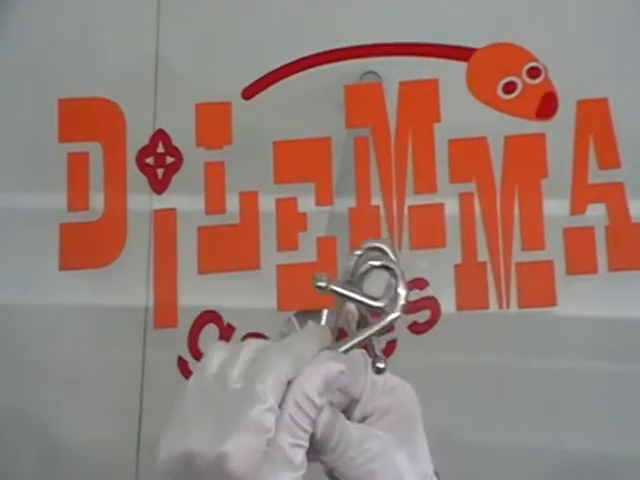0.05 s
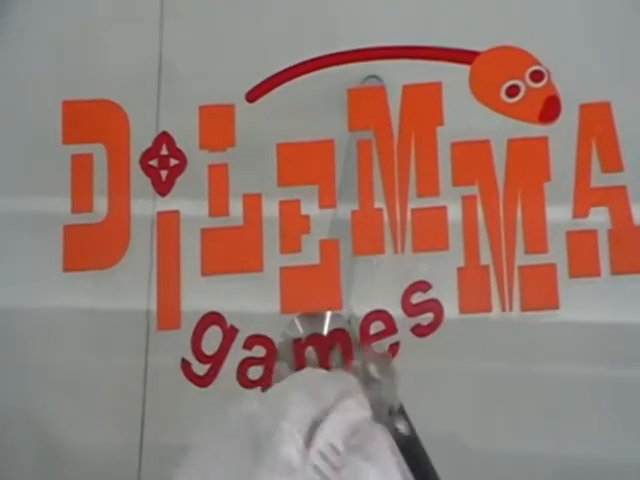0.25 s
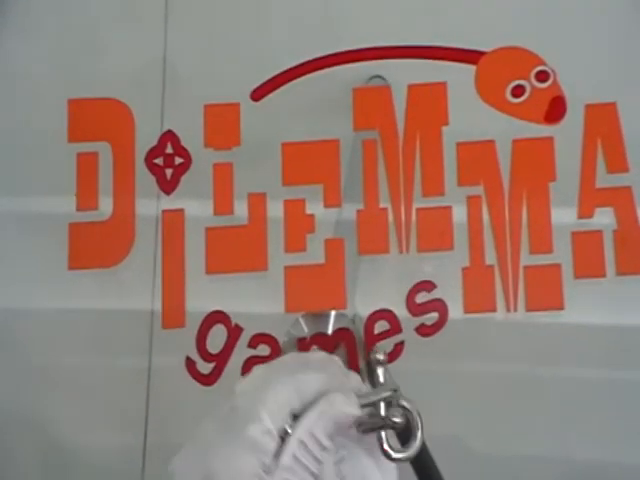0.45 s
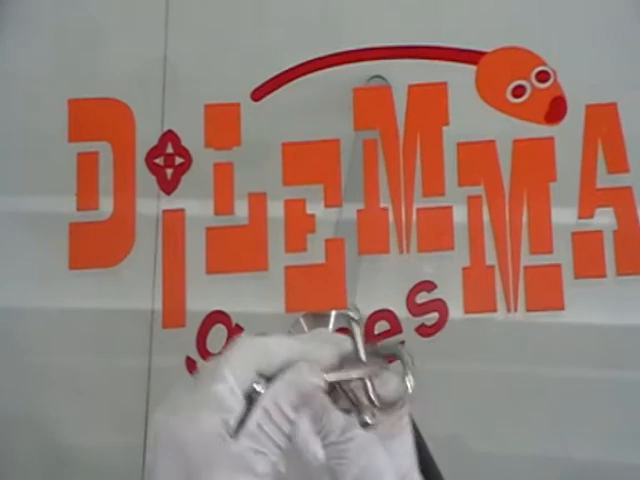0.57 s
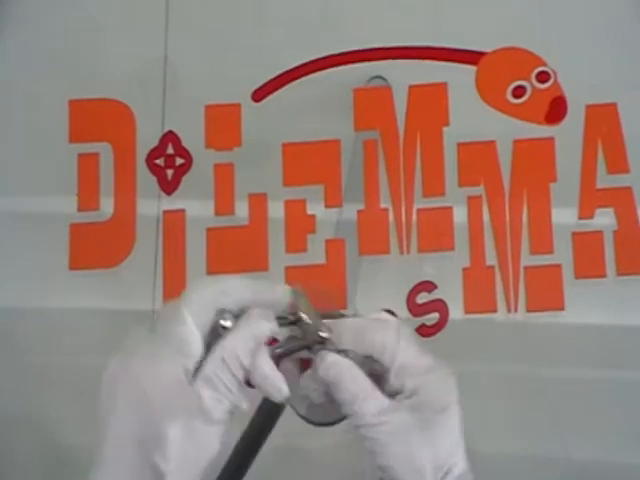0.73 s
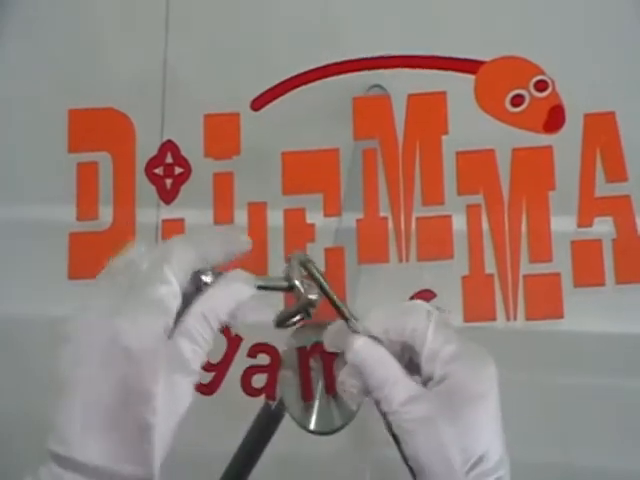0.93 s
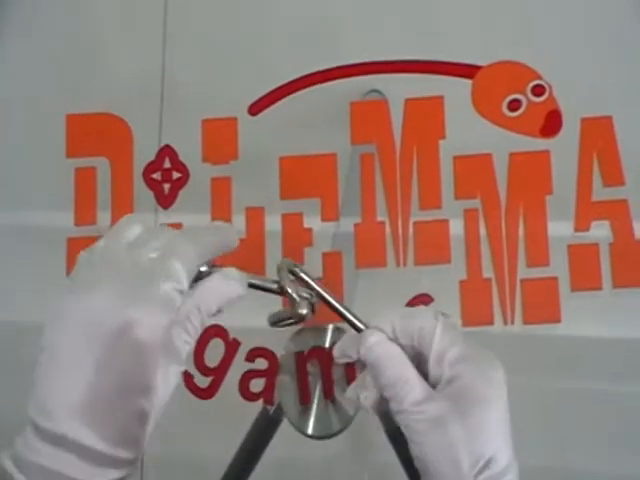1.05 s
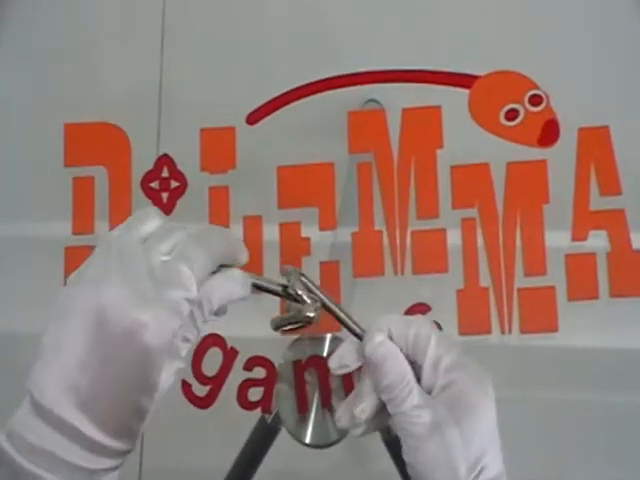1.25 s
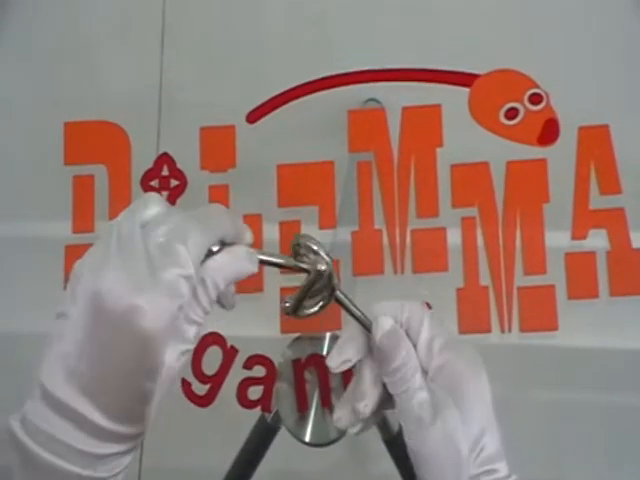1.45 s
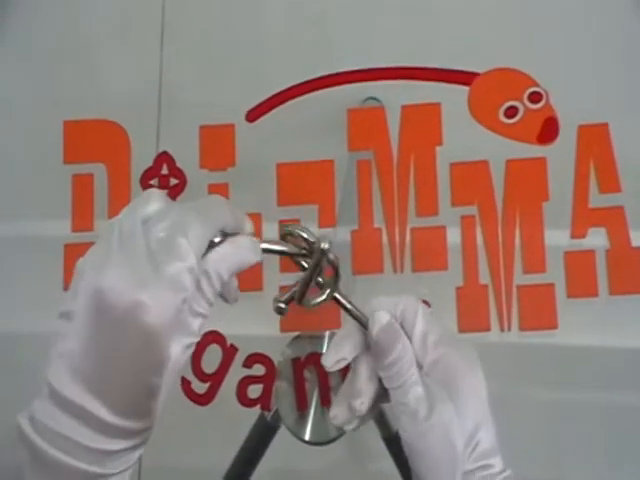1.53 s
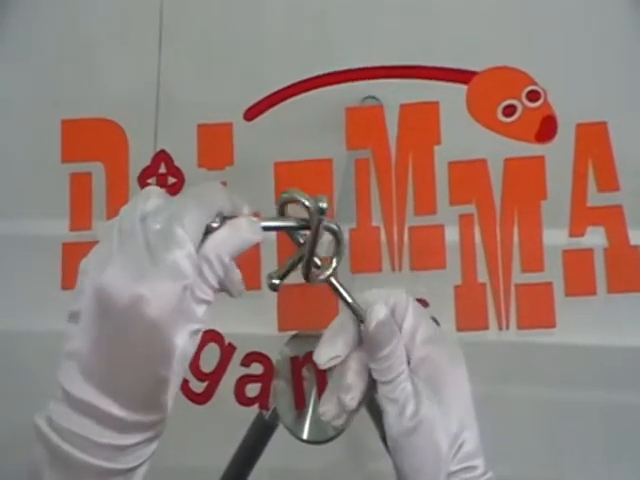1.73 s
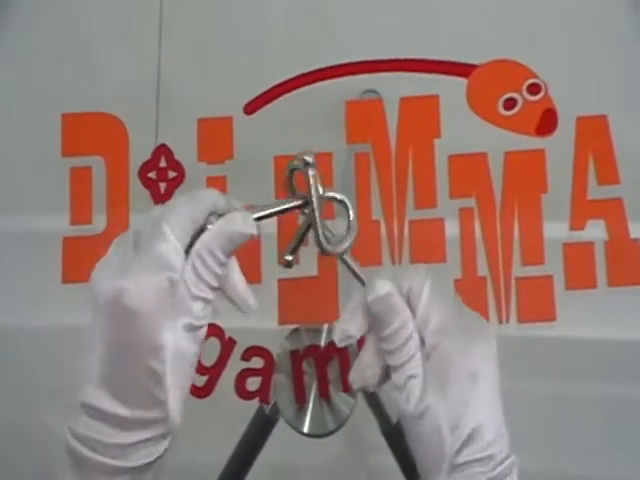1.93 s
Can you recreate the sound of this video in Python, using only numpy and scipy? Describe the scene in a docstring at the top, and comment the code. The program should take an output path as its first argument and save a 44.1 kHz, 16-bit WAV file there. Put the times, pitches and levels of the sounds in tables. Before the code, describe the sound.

Two bent steel rods knock together in a bright, quick rattle, pause, then rattle again more briefly; later only faint touches and a barely audible slide. Close microphone, small room, steady low ventilation hiss.

```python
"""A steady low hiss of ventilation and faint hums come first: shaped random spectra and wavering sines.
Two bent steel puzzle rods in gloved hands then knock and rattle together twice and later touch lightly.
Each contact adds a short noise crack to dying sines, the bending modes of both rods.
Chatter fills the rattles, dry ticks and a faint slide follow; echoes and a small room answer."""
import sys
import numpy as np
from scipy import signal
from scipy.io import wavfile
from scipy.ndimage import uniform_filter1d

SR = 44100
rng = np.random.default_rng(int(sys.argv[2]) if len(sys.argv) > 2 else 0)


def to_linear_factor(level_db):
    """Convert decibel levels (scalar or array-like) to linear amplitude factors."""
    exponent = np.asarray(level_db, float) / 20
    return 10 ** exponent


def wrap_up_sound(samples):
    """Save the sound to the file named by the first command line argument, as 16-bit audio."""
    columns = np.atleast_2d(samples).T
    # keep every value between -1 and 1, then stretch to whole-number steps
    tamed = np.clip(columns, -1, 1)
    steps = np.round(tamed * 32767).astype(np.int16)
    wavfile.write(sys.argv[1], SR, steps)


N = 88200

# Ventilation hiss spectral density: [freq_hz, relative_db_per_hz]
HISS_COLOUR = [(40, -31), (68, -26), (90, -10), (150, -2), (285, -3.5), (344, -4.5), (430, -10), (500, -19),
               (607, -9), (840, -11), (1020, -15), (1840, -19.5), (4000, -29.5), (8000, -43),
               (16000, -48.5)]
# Hiss left-right likeness: [freq_hz, correlation]
HISS_LIKENESS = [(250, 0.97), (500, 0.9), (1000, 0.82), (2000, 0.57), (16000, 0.19)]
HISS_RMS_DB = -45
# Steady hums: [pitch_hz, rms_db, waver_rms_hz]
HUMS = [(51, -72, 1.4), (113.2, -61, 5)]
# Drone that comes and goes: [time_s, pitch_hz, rms_db]
DRONE_PATH = [(0, 205.8, -45), (.2, 212.3, -54), (.33, 212.7, -46.5), (.9, 217.7, -61), (1.05, 221.8, -48),
              (1.201, 221.4, -52.5), (1.3, 223, -93.5)]
DRONE_SIDE_DB, DRONE_WAVER_RMS_HZ = -19, 1.2

# Rod contacts: [start_s, ring_db, first_over_second_rod_db, crack_db, upper_mode_ring_time_factor]
# The factor is small while fingers or the other rod damp the ring.
ROD_CONTACTS = [(.1995, -10, 12, -5, 0.35), (.202, -6.5, 4.5, -10, 0.35), (.2045, -13, 6, -15, 0.36),
                (.208, -9.5, 6, -17, 0.49), (0.2096, -17.5, -9.5, -20.5, 0.47),
                (.213, -20.5, 3, -25.5, 0.94), (.22, -26.5, -6, -14.5, 0.14), (.2235, -11, 1.5, -21, 0.5),
                (0.2281, -27, 6.5, -19.5, 0.48), (.2408, -7, 8, -7.5, 0.16), (.247, -17.5, 10, -24.5, 0.25),
                (.252, -14, 3.5, -14, 0.44), (.2565, -24, -9.5, -25.5, 0.4), (.263, -20.5, -1, -28, 0.69),
                (.6165, -58, 0.5, -70.5, 1.1), (0.7002, -45, -4, -59, 0.25),
                (.7240, -13.5, -16, -15.5, 0.29), (.7297, -15.5, -7, -27, 0.43),
                (0.7396, -22, -16, -36, 0.56), (0.7456, -13, -10, -16, 0.16),
                (.7515, -15, -11.5, -19.5, 0.25), (.7548, -24.5, 8, -16, 0.14),
                (.7585, -19, 10, -28.5, 0.51), (1.1639, -42, -5, -51, 0.094),
                (1.502, -50.5, -2.5, -53.5, 0.11), (1.5204, -41.5, 6, -45, 0.15),
                (1.5806, -49, -3.5, -40, 0.36)]
# First rod bending modes: [pitch_hz]
FIRST_ROD_HZ = [2019, 3430, 6535, 6903, 7187, 10375, 10572, 10641, 12450, 14816, 15113]
# Second rod bending modes: [pitch_hz]
SECOND_ROD_HZ = [2035, 4700, 2955, 3445, 6480, 6600, 7035, 10260, 10462, 10604, 12616, 14892, 15177, 15310]
# First rod modes before damping: [relative_db, t60_s]
FIRST_ROD_MODES = [(-28, 0.12), (-26, 0.13), (-7.5, 0.243), (-5.5, .25), (-18, 0.15), (-3, 0.198),
                   (-3.5, .25), (2, 0.197), (-2.5, .2), (-10, .2), (-16, 0.15)]
# Second rod modes before damping: [relative_db, t60_s]
SECOND_ROD_MODES = [(-23.5, .04), (-22.5, 0.054), (-23, 0.13), (-23, 0.25), (-12.5, 0.35), (-3.5, 0.24),
                    (-14, 0.21), (-18.5, .2), (-4, .2), (-1.5, .22), (-15.5, .2), (-6.5, .25), (-4.5, 0.13),
                    (-12, .12)]
# First rod crack spectral density: [freq_hz, relative_db_per_hz]
FIRST_CRACK_COLOUR = [(2000, -36.5), (3200, -6.5), (5200, -31), (6500, 8.5), (10000, 0), (16000, -10)]
# Second rod crack spectral density: [freq_hz, relative_db_per_hz]
SECOND_CRACK_COLOUR = [(2000, -39), (3200, -6), (4500, -6), (6500, -12.5), (10000, -10), (13000, -8.5),
                       (16000, -17)]
CRACK_T60_S = 0.0045
SNAP = 6  # first sample of a burst, against unit noise after it
SPOT_RMS_DB = 3  # spread of mode levels with the struck spot
SOFT_BELOW_DB, DULL_ABOVE_HZ, DULL_DB_PER_DB = -31, 11500, 2  # gentle contacts hardly reach the top modes
HELD_ABOVE_HZ = 5000  # lower bending modes ring on whatever touches
DETUNE_RMS_HZ, LOW_DETUNE_RMS_HZ = 9, 24  # touch and grip shift each mode, the low ones most
GRIP_DB, GRIP_S = -12, 0.005  # fingers close at a rattle's end: upper modes drop
CLASH_DB = -2  # each later contact stifles the ring
STRIKE_S = 0.0004  # each ring fades in over its first fraction of a millisecond

# Nearby table, wall and hands
ECHOES_PER_SIDE, ECHO_DB, ECHO_FROM_S, ECHO_TO_S = 8, -26, 0.0011, 0.02
# Small room decay: [freq_hz, t60_s]
ROOM_DECAY = [(2000, .6), (4000, 0.54), (7000, 0.39), (10400, 0.35), (15000, 0.26)]
ROOM_DB, ROOM_SHARED_POWER = -6, 0.89
PAN_DB = 0.86  # left up, right down

# Rattle chatter: [start_s, end_s, level_db, first_over_second_rod_db]
RATTLES = [(0.208, 0.275, -30.5, -5.5), (0.7235, 0.762, -28.5, -5.5)]
CHATTER_PER_S = 2000
# Dry ticks, as of a glove seam catching: [start_s, level_db]
SEAM_TICKS = [(0.5574, -43.5), (.57, -39), (0.574, -40)]
# Tick spectral density: [freq_hz, relative_db_per_hz]
TICK_COLOUR = [(3000, -6), (10000, -3), (16000, -7)]
TICK_T60_S = 0.0075
# Metal sliding on metal: [time_s, slip_level_db]
SLIDE_PATH = [(1.41, -85), (1.46, -70.5), (1.53, -69), (1.58, -68), (1.62, -89)]
SLIPS_PER_S, SLIDE_SOFT_DB, SLIDE_RING_FACTOR = 550, 2, 0.069

EDGE_HZ = 15760


def evened(x):
    """Scales to rms 1."""
    return x / np.sqrt(np.mean(x ** 2) + 1e-20)


def read(points, hz):
    """Reads a table on a log-frequency axis."""
    f, value = np.transpose(points)
    return np.interp(np.log(hz + 1), np.log(f + 1), value)


def add(mix, start_s, sound):
    """Mixes a sound in at start_s."""
    part = mix[round(start_s * SR):][:len(sound)]
    part += sound[:len(part)]


def hiss():
    """Ventilation: random short-time spectra, partly alike on both sides."""
    frames, hz = N // 512 + 5, np.fft.rfftfreq(2048, 1 / SR)
    a, b, c, d = rng.standard_normal((frames, len(hz), 4)).T
    same = np.clip(read(HISS_LIKENESS, hz), -1, 1)[:, None]
    left = a + 1j * b
    right = same * left + np.sqrt(1 - same ** 2) * (c + 1j * d)
    spectra = np.array([left, right]) * to_linear_factor(read(HISS_COLOUR, hz)[:, None])
    noise = signal.istft(spectra, nperseg=2048, noverlap=1536)[1][:, :N]
    return to_linear_factor(HISS_RMS_DB) * evened(noise)


def waver():
    """Slow random drift, rms 1: noise smoothed twice."""
    smooth = uniform_filter1d(rng.standard_normal(N), size=3000)
    return evened(uniform_filter1d(smooth, size=3000))


def tone(hz):
    """Sine of rms 1 that follows a pitch track from a random phase."""
    cycles = np.cumsum(hz) / SR + rng.random()
    return np.sqrt(2) * np.sin(2 * np.pi * cycles)


def hums():
    """Wavering steady tones and a drone that leans left."""
    steady = sum(to_linear_factor(db) * tone(hz + waver_hz * waver()) for hz, db, waver_hz in HUMS)
    s, hz, db = np.transpose(DRONE_PATH)
    t = np.arange(N) / SR
    pitch_hz = np.interp(t, s, hz) + DRONE_WAVER_RMS_HZ * waver()
    drone = to_linear_factor(np.interp(t, s, db)) * tone(pitch_hz)
    lean = 1 + to_linear_factor(DRONE_SIDE_DB) * np.array([[1], [-1]])
    return steady + drone * lean


def burst(colour_db, t60_s):
    """A snap and a short dying noise tail of set energy, through a causal minimum-phase colour."""
    fade = to_linear_factor(-60 * np.arange(2048) / SR / t60_s)
    source = np.append(SNAP, rng.standard_normal(len(fade) - 1)) * fade
    hz = abs(np.fft.fftfreq(len(fade), 1 / SR))
    log_gain = np.log(to_linear_factor(colour_db(hz)))
    colour = np.exp(np.conj(signal.hilbert(log_gain)))  # minimum phase
    noise = np.fft.ifft(np.fft.fft(source) * colour).real
    return noise * np.linalg.norm(fade) / np.linalg.norm(noise) / 2


def crack(balance_db):
    """Contact burst whose colour leans to the rod that sounds more."""
    share = np.clip(balance_db / 10 + 0.7, 0, 1)

    def colour_db(hz):
        return share * read(FIRST_CRACK_COLOUR, hz) + (1 - share) * read(SECOND_CRACK_COLOUR, hz)

    return burst(colour_db, CRACK_T60_S)


def ring(modes_hz, modes, hold, soft_db, free_s, later_s):
    """Bending modes as dying sines; the struck spot sets sign and strength of each."""
    hz = np.array(modes_hz)[:, None]
    db, t60_s = np.transpose(modes)[:, :, None]
    t = np.arange(SR // 2) / SR
    sign, spot, shift = rng.standard_normal((3, len(modes), 1))
    upper = hz > HELD_ABOVE_HZ
    struck_db = db + SPOT_RMS_DB * spot - DULL_DB_PER_DB * soft_db * (hz > DULL_ABOVE_HZ)
    decay_db = -60 * t / (t60_s * max(hold, 0.05) ** upper)  # hold acts on upper modes only
    grip_db = upper * GRIP_DB * np.clip((t - free_s) / GRIP_S, 0, 1)
    clashes = uniform_filter1d(1. * np.searchsorted(later_s, t), size=30)  # later contacts so far
    level = to_linear_factor(struck_db + decay_db + grip_db + CLASH_DB * clashes)
    pitch_hz = hz + np.where(upper, DETUNE_RMS_HZ, LOW_DETUNE_RMS_HZ) * shift
    sines = np.sign(sign) * level * np.sin(2 * np.pi * pitch_hz * t)
    rise = np.sin(np.pi / 2 * np.minimum(t / STRIKE_S, 1)) ** 2
    return rise * sines.sum(0) / 4


def contacts():
    """Every contact rings both rods and cracks; grip and later contacts damp the ring."""
    out = np.zeros(N)
    for s, db, balance_db, crack_db, hold in ROD_CONTACTS:
        soft_db = max(SOFT_BELOW_DB - db, 0)
        free_s = min([end - s for _, end, *_ in RATTLES if end > s] + [1])
        later_s = [row[0] - s for row in ROD_CONTACTS if row[0] > s]
        touch = hold, soft_db, free_s, later_s
        first = to_linear_factor(db + balance_db / 2) * ring(FIRST_ROD_HZ, FIRST_ROD_MODES, *touch)
        second = to_linear_factor(db - balance_db / 2) * ring(SECOND_ROD_HZ, SECOND_ROD_MODES, *touch)
        add(out, s, first + second)
        add(out, s, to_linear_factor(crack_db) * crack(balance_db))
    return out


def echoes(x):
    """A few early reflections as single taps of random sign, different on each side."""
    taps = np.zeros((2, SR // 20))
    at = (SR * rng.uniform(ECHO_FROM_S, ECHO_TO_S, (2, ECHOES_PER_SIDE))).astype(int)
    np.put_along_axis(taps, at, to_linear_factor(ECHO_DB) * rng.choice([-1., 1.], at.shape), 1)
    return signal.fftconvolve(x[None], taps, axes=1)[:, :N]


def room(x):
    """Sparse taps of random sign, each band dying at its own speed, partly shared by both sides."""
    taps = np.zeros((3, SR))
    at = np.arange(200, SR - 20, 20) + rng.integers(0, 20, (3, (SR - 201) // 20))
    np.put_along_axis(taps, at, rng.choice([-1., 1.], at.shape), 1)
    same = np.clip(ROOM_SHARED_POWER, 0, 1)
    sides = np.sqrt(same) * taps[2] + np.sqrt(1 - same) * taps[:2]
    hz, t, z = signal.stft(sides, SR, nperseg=256)
    decay = to_linear_factor(-60 * t / read(ROOM_DECAY, hz)[:, None])
    tail = signal.istft(z * decay, SR, nperseg=256)[1]
    return signal.fftconvolve(x[None], tail / np.linalg.norm(tail[0]), axes=1)[:, :N]


def chatter():
    """Rattle: many tiny uneven cracks at random times, drawn from six crack shapes."""
    out, t = np.zeros(N), np.arange(N) / SR
    for start, end, db, balance_db in RATTLES:
        struck = (rng.random(N) < CHATTER_PER_S / SR) * (t > start) * (t < end)
        hits = struck * rng.standard_normal(N)
        kind = rng.integers(0, 6, N)
        for k in range(6):
            out += to_linear_factor(db) * signal.oaconvolve(hits * (kind == k), crack(balance_db))[:N]
    return out


def ticks():
    """Dry bright noise bursts without ring."""
    out = np.zeros(N)
    for s, db in SEAM_TICKS:
        add(out, s, to_linear_factor(db) * burst(lambda hz: read(TICK_COLOUR, hz), TICK_T60_S))
    return out


def slide():
    """Sliding metal feeds tiny random slips to the modes of both rods."""
    slips = rng.standard_normal(N) * (rng.random(N) < SLIPS_PER_S / SR)
    s, db = np.transpose(SLIDE_PATH)
    rub = to_linear_factor(np.interp(np.arange(N) / SR, s, db, -200, -200)) * evened(slips)
    both_hz, both_modes = FIRST_ROD_HZ + SECOND_ROD_HZ, FIRST_ROD_MODES + SECOND_ROD_MODES
    body = ring(both_hz, both_modes, SLIDE_RING_FACTOR, SLIDE_SOFT_DB, 1, [])
    return signal.fftconvolve(rub, body / np.linalg.norm(body))[:N]


def scene():
    """Rods and ticks just left of centre, their echoes and room, the hiss and hums."""
    near = contacts() + chatter() + ticks() + slide()
    direct = near * to_linear_factor(np.array([[PAN_DB], [-PAN_DB]]))
    return direct + echoes(near) + to_linear_factor(ROOM_DB) * room(near) + hiss() + hums()


def top_cut(x):
    """Nothing passes above the cut-off."""
    return signal.sosfilt(signal.butter(12, 16880, fs=SR, output="sos"), x)


def record(dry):
    """Band limit: a steep linear-phase low-pass."""
    lowpass = signal.firwin(511, EDGE_HZ, window=("kaiser", 8), fs=SR)
    mix = signal.oaconvolve(dry, lowpass[None], "same")
    return top_cut(mix)


dry = scene()
out = record(dry)
wrap_up_sound(out)
```